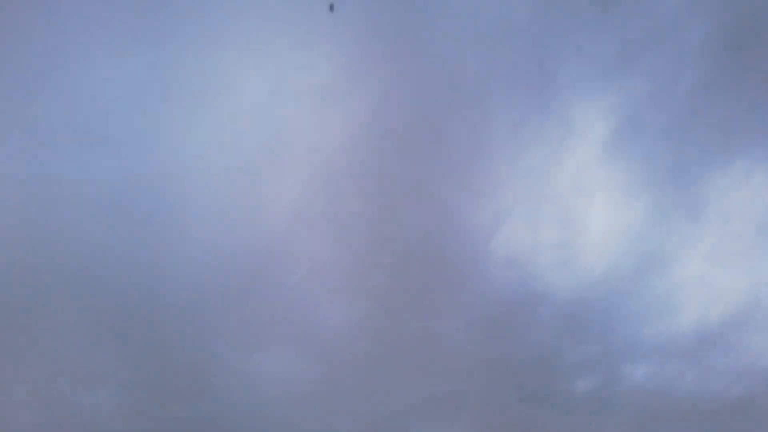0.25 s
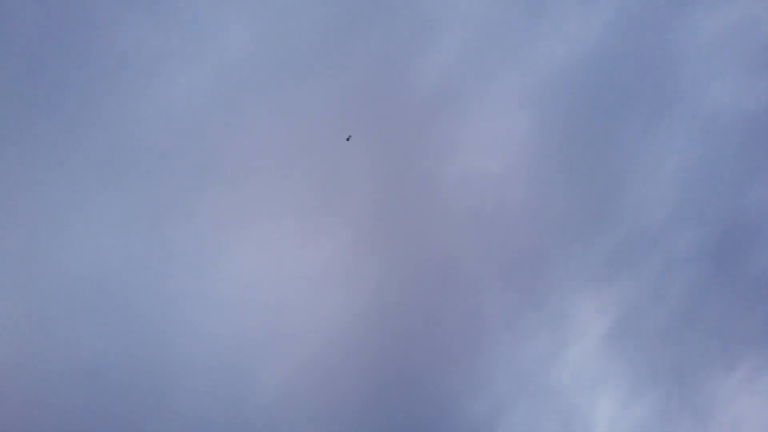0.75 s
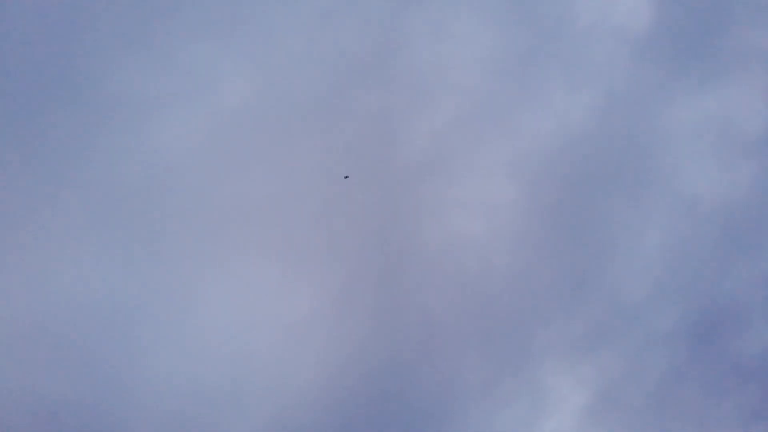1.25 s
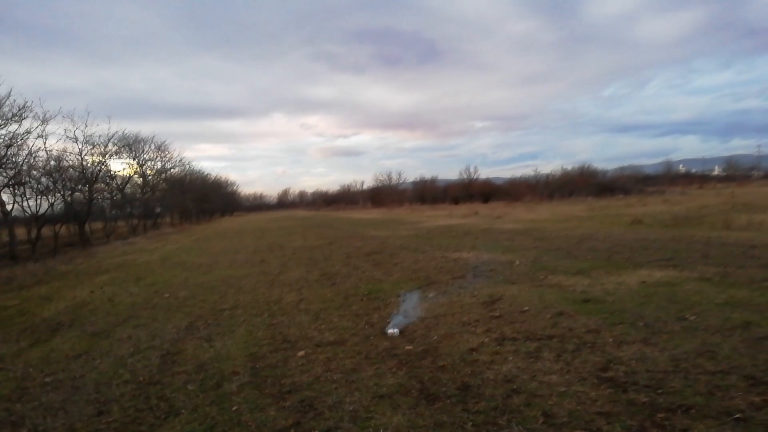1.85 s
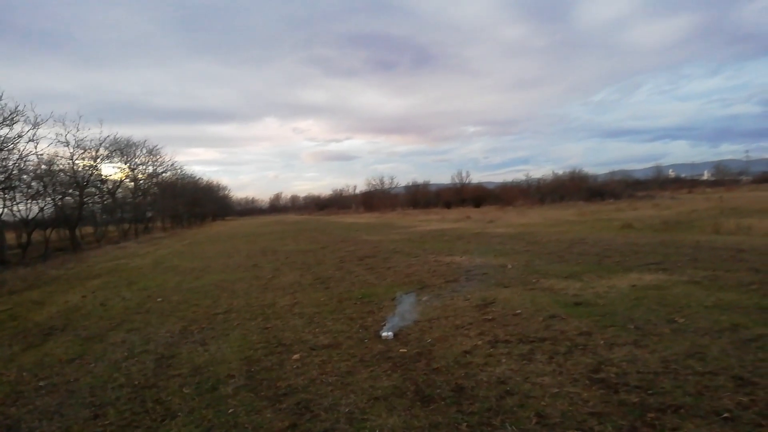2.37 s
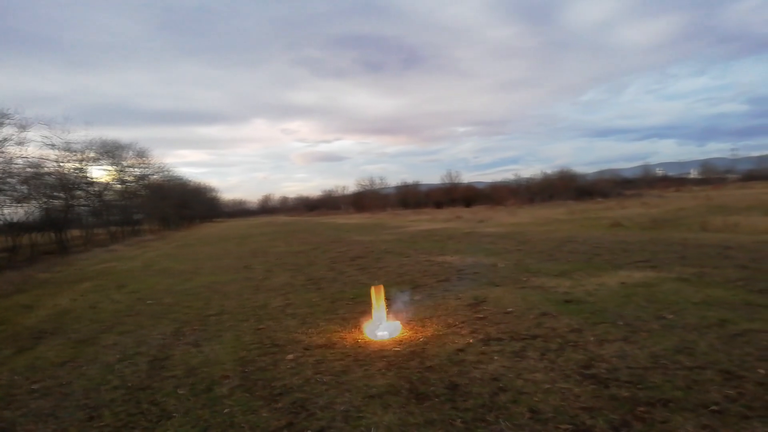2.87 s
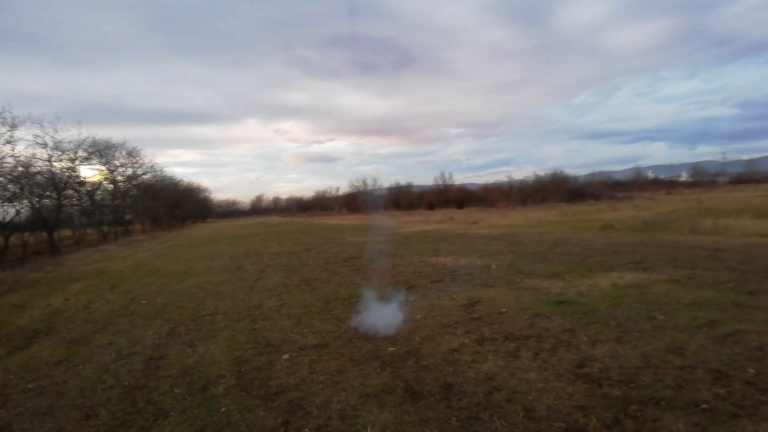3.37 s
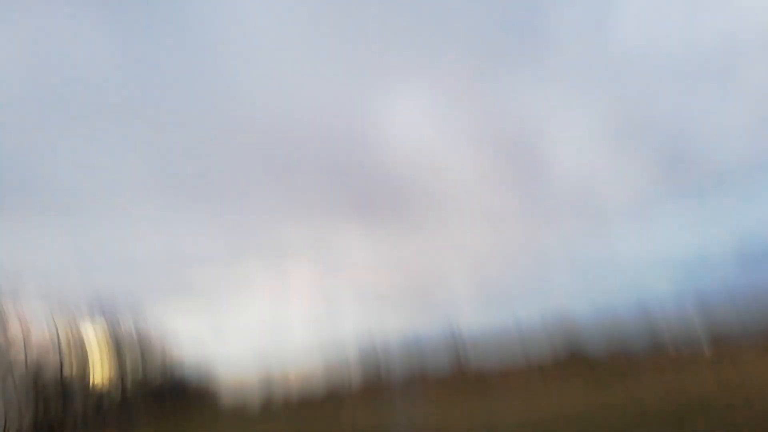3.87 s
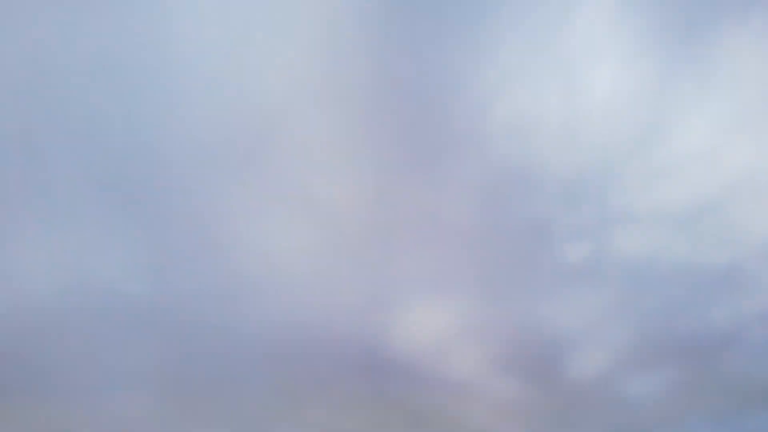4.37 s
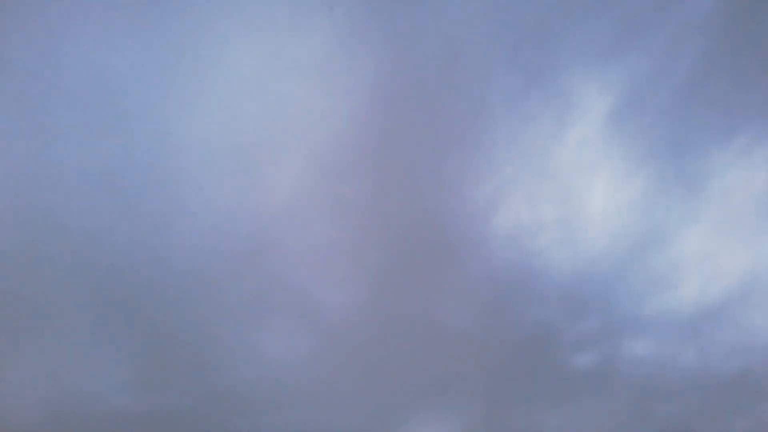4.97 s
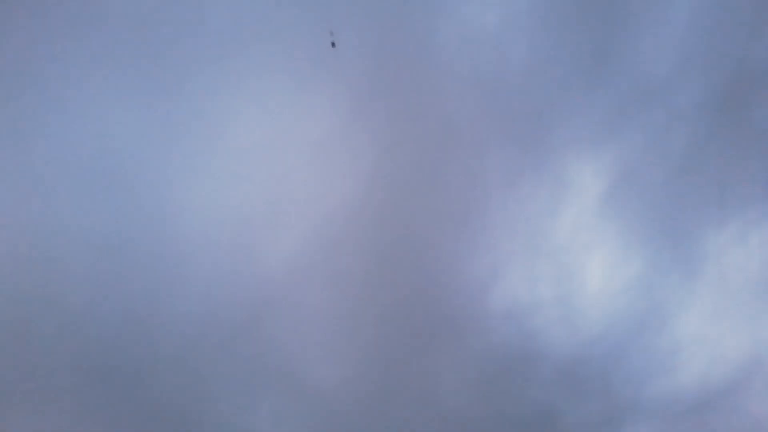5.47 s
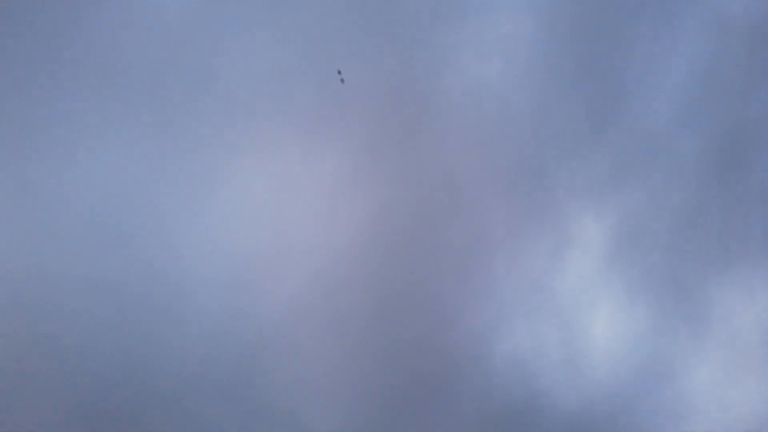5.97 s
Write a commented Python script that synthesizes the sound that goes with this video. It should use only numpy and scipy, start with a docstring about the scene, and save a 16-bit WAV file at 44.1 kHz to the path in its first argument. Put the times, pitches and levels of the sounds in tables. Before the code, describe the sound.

Outdoors through a small, easily overloaded stereo microphone: first smooth hiss thinning into snapping crackles over soft low fluttering, then a sudden change to faint field hiss, distant murk and wind thumps. A fuse sputters for a moment. After a short lull a firecracker explodes with a hard, distorted crack, followed by a rough reflected wash and separate thudding echoes within deep rolling rumble that lasts to the end.

```python
"""Firecracker on an open field

A big firecracker through a small stereo microphone, built from coloured noise and shaped pressure fronts.
First a fading hiss breaks up into sharp crackles over a low flutter; then an abrupt change to the quiet
field, with wind on the microphone and a flaring fuse. The blast drives the microphone into overload and
rings its ports; grass and tree lines scatter it back, and echoes stand out of a long low rumble."""
import sys
import numpy as np
from scipy import signal
from scipy.fft import rfft, irfft
from scipy.io import wavfile

SR = 44100
rng = np.random.default_rng(int(sys.argv[2]) if len(sys.argv) > 2 else 0)


def transcribe(u):
    """Save the signal u as a 16-bit wav file named by the first command-line argument.

    u: samples, shape (n,) or (channels, n), limited to [-1, 1]; the rate is SR.
    q: integer samples, one column per channel.
    """
    v = np.clip(np.atleast_2d(u).T, -1, 1)
    q = np.round(v * 32767).astype(np.int16)
    wavfile.write(sys.argv[1], SR, q)


N = 274302
TIME = np.arange(N) / SR  # seconds
BINS = np.maximum(np.arange(N // 2 + 1) * SR / N, 1)  # spectrum frequencies in Hz
CHANGE_S = 1.5  # the opening gives way to the field

# Colour of dull pops and sputter. Each row: frequency in Hz, relative level in dB.
POP_COLOUR = [(180, -34), (320, 12.5), (600, 3.5), (1000, 4.5), (1500, -10.5), (2600, -4), (4000, -36)]
# Pressure fronts of the blast, ahead of the overload.
# Each row: start in seconds, drive in dB, length of the overpressure in seconds, left-right in dB.
FRONTS = [(3.424, 19.5, 0.0019, -13), (3.4297, 14, .0075, -11), (3.4415, 9.5, 0.0071, 10.5)]
BLAST_S = FRONTS[0][0]
# Distinct echoes; every layer adds its own offset to the level.
# Each row: start in seconds, nominal level in dB, left-right in dB.
ECHOES = [(3.623, -10, -1), (3.643, -19, -7), (3.819, -18, -1), (3.852, -19.5, -1), (3.943, -17.5, 4),
          (4.034, -21, 2), (4.181, -15.5, -9), (4.271, -18, 3), (4.305, -23.5, -0.5), (4.4, -14, 1),
          (4.42, -19.5, -2), (4.551, -16, -5), (4.573, -23.5, 0), (4.656, -19.5, 4.5), (4.81, -20, -4.5),
          (4.882, -16.5, 0), (4.992, -27.5, -1.5), (5.108, -22.5, -5), (5.886, -23, 4.5), (6.02, -27, -2)]


def from_db(db):
    """Decibels to gain."""
    return 10 ** (np.asarray(db) / 20)


def rms_one(x):
    """Scale to unit power."""
    return x / np.sqrt(np.mean(x ** 2) + 1e-20)


def gains(rows):
    """Each dB column of a curve as a gain per sample."""
    s, *columns = np.transpose(rows)
    return [from_db(np.interp(TIME, s, c)) for c in columns]


def at_hz(points, hz):
    """Read a spectrum on a log-frequency axis."""
    f, value = np.transpose(points)
    return np.interp(np.log(hz), np.log(f), value)


def pan(db):
    """Left and right gains for a level difference, at constant power."""
    pair = np.array([from_db(db / 2), from_db(-db / 2)]).reshape(2, -1)
    return pair / np.sqrt(np.mean(pair ** 2, axis=0))


def since(s):
    """Seconds gone by after s, zero before."""
    return np.maximum(TIME - s, 0)


def after(s, rise=.003):
    """A short fade-in that starts at s."""
    return np.clip((TIME - s) / rise, 0, 1)


def burst(s, t60):
    """A sudden start that dies away by 60 dB in t60 seconds."""
    return (TIME >= s) * from_db(-60 * np.clip((TIME - s) / t60, 0, 4))


def swell(s, rise, t60):
    """A rounded start that dies away."""
    return np.sin(np.pi / 2 * after(s, rise)) ** 2 * burst(s, t60)


def hump(s, half):
    """A smooth rise and fall around s."""
    return np.exp(-np.minimum(((TIME - s) / half) ** 2, 50))


def wave(s, length, rise):
    """A pressure front: it jumps up, then falls through zero into a short suction."""
    age = np.clip((TIME - s) / length, 0, 30)
    return np.sin(np.pi / 2 * after(s, rise)) * (1 - age) * np.exp(-age ** 2 / 2)


def drift(rate):
    """Random wander with spread 1, slower than about rate in Hz."""
    return rms_one(irfft(rfft(rng.standard_normal(N)) / (1 + (BINS / rate) ** 2), N))


def noise(colour, alike=0., grain_db=0., grain_rate=100):
    """Stereo noise, clumped into grains and then coloured; alike is the left-right correlation."""
    mid, side = rng.standard_normal((2, N))
    alike = np.clip(alike, -1, 1)
    white = np.sqrt(1 + alike) * mid + np.sqrt(1 - alike) * side * [[1], [-1]]
    clumped = white * from_db(grain_db * np.clip(drift(grain_rate), -3, 3))
    # roll off beyond both ends of the colour
    top = 1 / (1 + (BINS / colour[-1][0]) ** 10)
    bottom = 1 / (1 + (colour[0][0] / BINS) ** 10)
    return rms_one(irfft(rfft(clumped) * from_db(at_hz(colour, BINS)) * top * bottom, N))


def opening():
    """A low flutter, a brief sputter and a fading rush; a smooth bright hiss breaks up into dry crackles."""
    # Flutter level. Each row: time in seconds, level in dB.
    flutter_curve = [(0, -27.5), (.17, -24.5), (.36, -29), (.42, -31), (.68, -35.5), (.75, -29.5),
                     (.9, -30), (1.15, -37), (1.36, -32.5), (1.49, -32.5)]
    # Sharp crackles. Each row: start in seconds, nominal level in dB.
    crackle_hits = [(0.6755, -36), (0.809, -33), (0.9567, -26), (1.046, -26), (1.0564, -29), (1.075, -21.5),
                    (1.1267, -26.5), (1.2036, -22.5), (1.2984, -19), (1.3023, -14.5), (1.378, -26),
                    (1.4612, -26)]
    # Colours of the layers. Each row: frequency in Hz, relative level in dB.
    flutter_colour = [(22, 1), (45, 2), (80, 3), (110, -2.5), (140, 0), (200, -2), (290, -3.5),
                      (350, -12.5), (450, -26), (600, -37)]
    rush_colour = [(400, 3), (700, 1.5), (950, 2), (1350, -3), (1900, 2), (3000, -2), (4500, -4),
                   (7000, -13), (9000, -14.5)]
    hiss_colour = [(2500, -7), (5000, -9), (7500, -7.5), (9700, -2), (12000, -20), (16000, -36.5)]
    crackle_colour = [(1800, -19.5), (5000, -19.5), (7500, -12.5), (9700, -3.5), (12000, -14), (16000, -11)]

    # the flutter starts thin and soon gains its deepest part
    flutter, = gains(flutter_curve)
    bass_cut_hz = 130
    full = noise(flutter_colour, alike=0.81, grain_db=-1.5, grain_rate=52)
    thin = signal.sosfilt(signal.butter(3, bass_cut_hz, "high", fs=SR, output="sos"), full)
    deepened = after(0.21, rise=0.072)
    low = flutter * (deepened * full + (1 - deepened) * thin)

    # the rush dies away slowly, the hiss over it quickly
    rush_db, rush_fall_db_per_s, waver_db = -41.5, 5.5, 1.9
    rush = from_db(rush_db - rush_fall_db_per_s * TIME + waver_db * drift(rate=9))
    middle = rush * noise(rush_colour, alike=0.026, grain_db=2.0, grain_rate=55) * pan(db=-2.5)
    hiss_db, hiss_fall_db_per_s = -27, 88
    hiss = from_db(hiss_db - hiss_fall_db_per_s * TIME)
    smooth = hiss * noise(hiss_colour, grain_db=1.5, grain_rate=400) * pan(db=3.0)

    # fine crackle builds up under the sharp snaps
    fine_db, fine_rise_db_per_s = -61.5, 10
    fine = from_db(fine_db + fine_rise_db_per_s * np.minimum(TIME, CHANGE_S))
    snaps = sum(from_db(db - 7) * burst(s, t60=0.016) for s, db in crackle_hits)
    crackle = (fine + snaps) * noise(crackle_colour, grain_db=3.0, grain_rate=450) * pan(db=1.5)

    # a dull sputter stops short
    sputter_db, sputter_end_s, sputter_fall_db_per_s = -40, 0.22, 220
    sputter_level = from_db(sputter_db - sputter_fall_db_per_s * since(sputter_end_s))
    sputter = sputter_level * noise(POP_COLOUR, alike=.5, grain_db=4, grain_rate=60)
    return low + middle + smooth + crackle + sputter


def murk():
    """A steady distant murk of noise."""
    # Distant background. Each row: frequency in Hz, relative level in dB.
    murk_colour = [(35, 1), (78, 16.5), (120, -6.5), (160, 0.5), (270, 3), (400, -6), (600, -13.5),
                   (780, -4.5), (950, -7.5), (1120, -16), (1400, -24)]
    return from_db(-36.5) * noise(murk_colour, alike=0.17, grain_db=0.7, grain_rate=26) * pan(db=-3.5)


def pops():
    """Short dull pops: noise bursts with a rounded start."""
    # Each row: start in seconds, nominal level in dB.
    pop_hits = [(0.805, -36.5), (1.008, -38), (2.379, -36), (2.426, -44), (2.802, -42), (3.346, -40),
                (3.378, -34.5)]
    level = sum(from_db(db + 3.0) * swell(s, rise=0.0015, t60=0.052) for s, db in pop_hits)
    return level * noise(POP_COLOUR, alike=0.42)


def field():
    """A faint hiss with scattered ticks; both sink for a while after the blast."""
    # Hiss level. Each row: time in seconds, level in dB.
    hiss_curve = [(1.5, -55.5), (3.3, -52.5), (3.5, -55), (4.3, -75), (5.1, -67), (5.6, -61), (6.22, -59.5)]
    # Hiss colour. Each row: frequency in Hz, relative level in dB.
    hiss_colour = [(1400, -6.5), (2000, 3.5), (2700, 2.5), (3900, -6.5), (4600, -47.5), (9000, -30),
                   (14000, -47)]
    level, = gains(hiss_curve)
    # tick levels are relative to the hiss
    ticks_per_s, tick_db, tick_spread_db, tick_t60_s = 7, 2, 3, .03
    tick_gain = from_db(tick_db + tick_spread_db * rng.uniform(-1, 1, N))
    starts = (rng.random(N) < ticks_per_s / SR) * tick_gain
    decay = from_db(-60 / (tick_t60_s * SR))
    ticks = signal.lfilter([1], [1, -decay], starts + 1e-18)
    return level * np.hypot(1, ticks) * noise(hiss_colour, alike=0.033, grain_db=2.0, grain_rate=130)


def fuse():
    """The fuse sputters up, burns at full strength for a moment and sinks into the casing."""
    # Each row: frequency in Hz, relative level in dB.
    fuse_colour = [(150, 4), (330, 11), (600, 3), (1400, -8), (2000, 5), (2600, 12.5), (3100, 2.5),
                   (3900, -13), (4500, -77), (8800, -19.5), (11000, -64)]
    flare_s, hold_s, flare_db = 2.375, 0.17, -38
    rise_db_per_s, fall_db_per_s = 64, 95
    below_db = rise_db_per_s * np.maximum(flare_s - TIME, 0) + fall_db_per_s * since(flare_s + hold_s)
    return from_db(flare_db - below_db) * noise(fuse_colour, alike=0.11, grain_db=3.0, grain_rate=140)


def wind():
    """A breeze with a few stronger gusts buffets both microphone ports."""
    # Steady push. Each row: time in seconds, level in dB.
    breeze = [(1.5, -30), (2.5, -31.5), (3.2, -25.5), (4.1, -33.5), (4.8, -28), (5.15, -18), (5.55, -24),
              (6.22, -24.5)]
    # Gusts added to the push. Each row: centre in seconds, peak level in dB, half-length in seconds.
    gusts = [(1.649, -17.5, .05), (3.222, -21, .03), (3.398, -18.5, 0.028), (4.417, -19, 0.017),
             (5.263, -20, 0.018), (5.966, -26.5, 0.036)]
    # Each row: frequency in Hz, relative level in dB.
    wind_colour = [(14, 6.5), (25, 11.5), (38, -1.5), (52, 2), (75, -15), (110, -30), (200, -46.5)]
    push = gains(breeze)[0] + sum(from_db(db) * hump(s, half) for s, db, half in gusts)
    return push * noise(wind_colour, alike=.8, grain_db=1.0, grain_rate=4.1)


def capsule(pressure, limit=0.9, corner_hz=4500):
    """The diaphragm reaches the end of its travel, and its mass rounds the flattened edges."""
    flattened = limit * np.tanh(pressure / limit)
    return signal.sosfilt(signal.butter(1, corner_hz, fs=SR, output="sos"), flattened)


def blast():
    """Short fronts are steep, long ones rounded; the casing cracks, hot gas roars and the ports ring."""
    # Colours of crack and gas. Each row: frequency in Hz, relative level in dB.
    crack_colour = [(900, 4.5), (2600, 5), (4900, -10.5), (7000, -35), (10000, -9), (16000, -30)]
    gas_colour = [(80, -9.5), (200, 8), (350, 3.5), (700, -4.5), (1100, -29.5), (1500, -19.5), (2600, -8.5),
                  (3600, -18)]
    # Port resonances, ahead of the overload.
    # Each row: frequency in Hz, left drive in dB, right drive in dB, 60 dB decay in seconds.
    port_modes = [(1514, -3, -7, 0.0218), (2002, 5, -12, 0.026), (2347, 7, -0.5, 0.054),
                  (2430, 4, -2, 0.043)]
    pressure = sum(from_db(db) * pan(side) * wave(s, length, rise=55 * length ** 2)
                   for s, db, length, side in FRONTS)
    crack = from_db(3) * burst(BLAST_S, t60=0.028) * noise(crack_colour, alike=0.2)
    gas = from_db(7) * burst(BLAST_S, t60=0.055) * noise(gas_colour, alike=0.94)
    ports = sum(from_db([[left], [right]]) * burst(BLAST_S, t60) * np.sin(2 * np.pi * hz * (TIME - BLAST_S))
                for hz, left, right, t60 in port_modes)
    return capsule(pressure + crack + gas + ports)


def trees():
    """Countless small reflections from grass, twigs and trunks; later ones have lost treble to the air."""
    # Each row: frequency in Hz, relative level in dB.
    trees_colour = [(300, -5), (500, 6), (720, 3), (950, 1), (1400, -9.5), (1900, -2), (2350, 6),
                    (3000, -9), (3900, -17.5), (4400, -65), (7000, -50.5), (9000, -23.5), (10500, -57.5)]
    # Each row: frequency in Hz, left-right in dB.
    trees_balance = [(300, -7.5), (1300, 3), (1900, 4), (2350, 10.5), (3100, -0.5), (9000, 7)]
    grass = from_db(-26.5) * burst(BLAST_S, t60=0.24)

    # the tree line answers from its near end to its far end, ever fainter, then falls faster still
    near_s, rise_s, far_s = 3.52, 0.098, 4.46
    near_db, fall_db_per_s, extra_fall_db_per_s = -27, 17, 5.5
    line_db = near_db - fall_db_per_s * since(near_s) - extra_fall_db_per_s * since(far_s)
    line = after(near_s, rise_s) * from_db(line_db)
    # centred ahead of the blast: only a vanishing trace is left once the returns open
    early_hump = from_db(-29) * hump(3.3, half=0.036)
    level = grass + line + early_hump

    scatter = rfft(noise(trees_colour, alike=.03, grain_db=1.5, grain_rate=170))
    scatter = scatter * pan(at_hz(trees_balance, BINS))
    air_hz, air_db_per_s = 3200, 13
    loss_db_per_s = air_db_per_s / (1 + (air_hz / BINS) ** 8)
    ages = np.linspace(0, 2, 5)  # seconds after the blast
    out = 0
    for age, share in zip(ages, np.eye(len(ages))):  # fade through ever duller copies
        dulled = irfft(scatter * from_db(-loss_db_per_s * age), N)
        out = out + np.interp(TIME - BLAST_S, ages, share) * dulled
    return level * out


def rumble():
    """Far woods and hills return a long roll, made lumpy by the boom behind each echo."""
    # Level of the upper roll. Each row: time in seconds, level in dB.
    roll_curve = [(3.47, -26.5), (3.58, -37), (4.1, -34.5), (4.7, -28.5), (4.78, -36.5), (5.15, -31),
                  (5.65, -33), (5.94, -27), (6.0, -31), (6.22, -28)]
    # Colours of both parts. Each row: frequency in Hz, relative level in dB.
    deep_colour = [(45, -1), (75, -5), (100, -5), (128, -10), (175, -7), (240, -7), (350, -19),
                   (700, -43.5)]
    roll_colour = [(150, -18.5), (270, 3), (400, 3), (520, -4.5), (700, -14.5), (1100, -20), (1450, -34.5),
                   (2200, -31.5), (2700, -40)]
    boom_db, boom_t60_s = -8, 0.27  # level against the echo
    booms = np.sqrt(sum((from_db(db + boom_db) * swell(s, rise=0.0087, t60=boom_t60_s)) ** 2
                        for s, db, side in ECHOES))
    # layers add by power: an even decay, the booms, and a last deep roll from the hills
    deep_db, deep_fall_db_per_s = -25, 5
    decay = from_db(deep_db - deep_fall_db_per_s * since(BLAST_S))
    hills = from_db(-30.5) * hump(6.05, half=0.14)
    deep = np.hypot(np.hypot(decay, from_db(2.5) * booms), hills)
    upper = np.hypot(gains(roll_curve)[0], booms)
    low = deep * noise(deep_colour, alike=-0.086, grain_db=5.0, grain_rate=54) * pan(db=1.0)
    roll = upper * noise(roll_colour, alike=.05, grain_db=2.0, grain_rate=51) * pan(db=-3.0)
    return low + roll


def echoes():
    """Each distinct echo is a dulled pressure front with a short scattered tail."""
    # Tail colour. Each row: frequency in Hz, relative level in dB.
    echo_colour = [(110, -4.5), (180, -24.5), (480, -23), (700, -10), (1100, -14.5), (1500, -39),
                   (2300, -22), (3000, -44.5)]
    fronts = sum(from_db(db - 3) * pan(side) * wave(s, length=0.00073, rise=0.00023)
                 for s, db, side in ECHOES)
    bass_cut_hz, dull_hz = 130, 1800
    fronts = signal.sosfilt(signal.butter(2, bass_cut_hz, "high", fs=SR, output="sos"), fronts)
    fronts = signal.sosfilt(signal.butter(8, dull_hz, fs=SR, output="sos"), fronts)
    tails = sum(from_db(db - 20.5) * pan(side) * swell(s, rise=0.0033, t60=0.15) for s, db, side in ECHOES)
    return fronts + tails * noise(echo_colour, alike=0.033)


def scene():
    """The opening gives way to the field, the blast and its echoes."""
    outdoors = after(CHANGE_S - .002)
    far = murk()
    first = opening() + from_db(-16.0) * far
    then = far + field() + fuse() + wind()
    returns = after(BLAST_S) * (trees() + rumble() + echoes())
    return (1 - outdoors) * first + outdoors * then + pops() + blast() + returns


def record(dry):
    """The input overloads smoothly at full scale; a steep low-pass cuts the top."""
    clipped = dry / (1 + dry ** 8) ** (1 / 8)
    stop_hz, stop_db = 16848, 60  # from here up at least this much is taken away
    return signal.sosfilt(signal.cheby2(12, stop_db, stop_hz, fs=SR, output="sos"), clipped)


dry = scene()
out = record(dry)
transcribe(out)
```